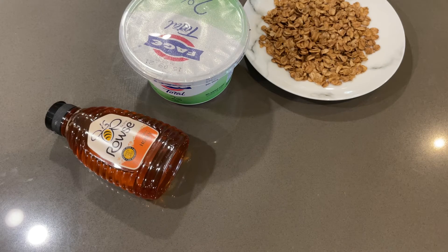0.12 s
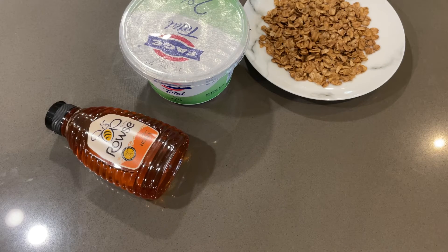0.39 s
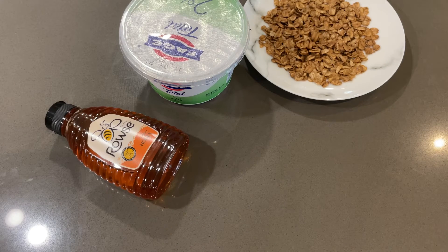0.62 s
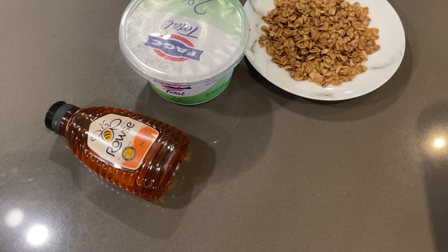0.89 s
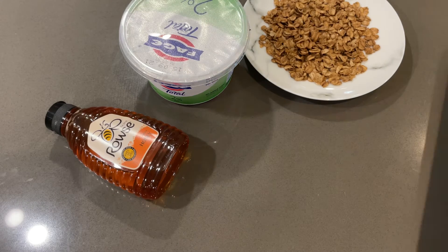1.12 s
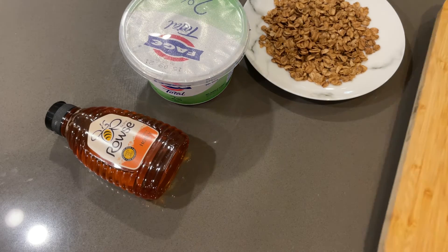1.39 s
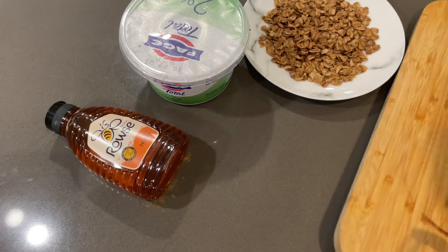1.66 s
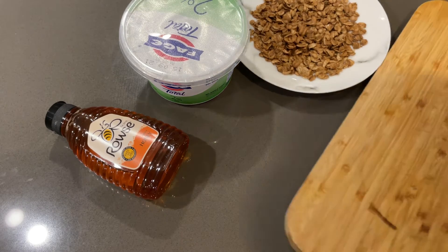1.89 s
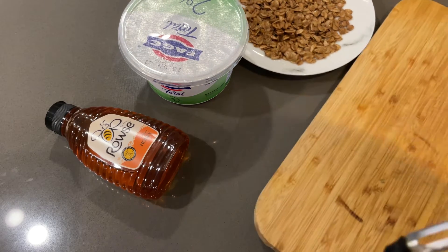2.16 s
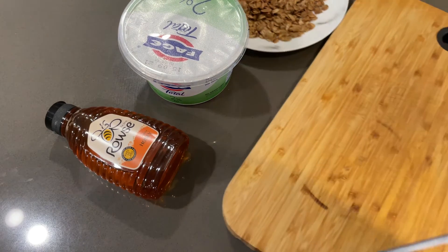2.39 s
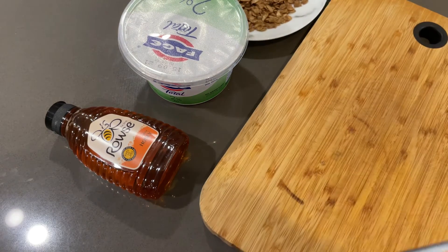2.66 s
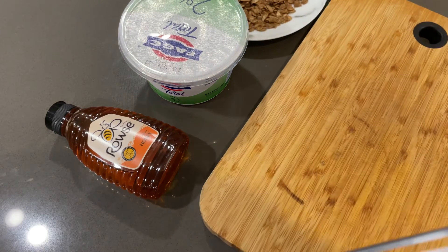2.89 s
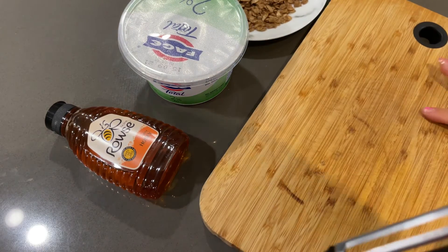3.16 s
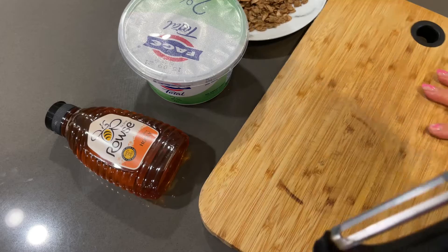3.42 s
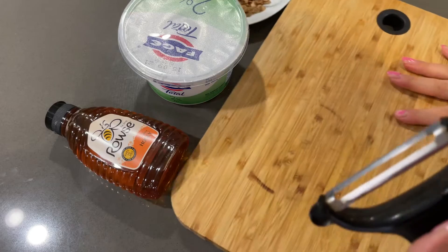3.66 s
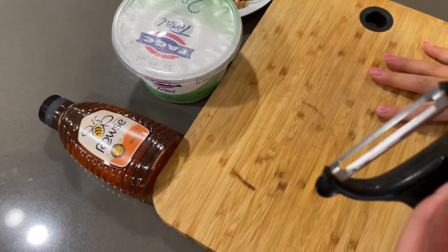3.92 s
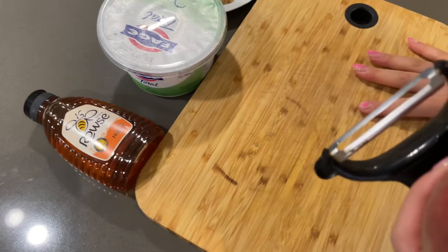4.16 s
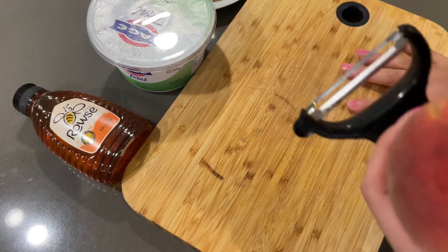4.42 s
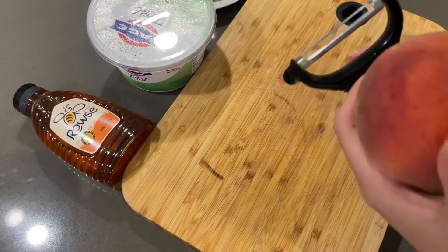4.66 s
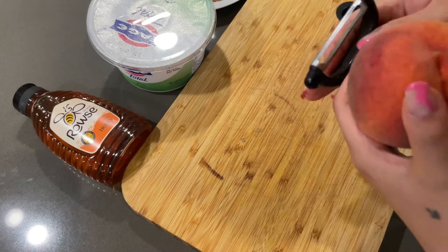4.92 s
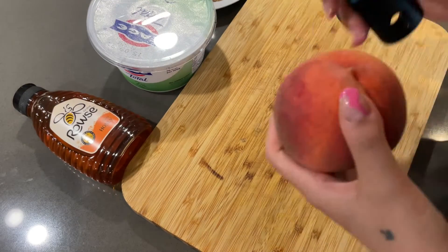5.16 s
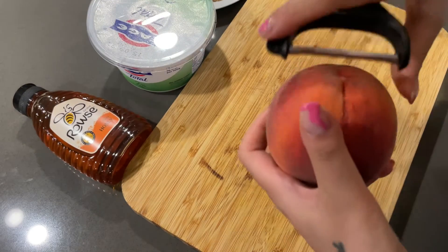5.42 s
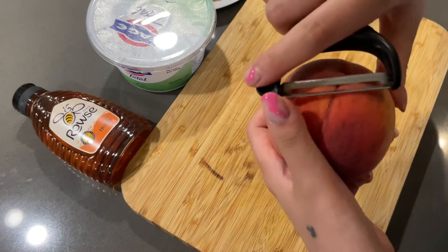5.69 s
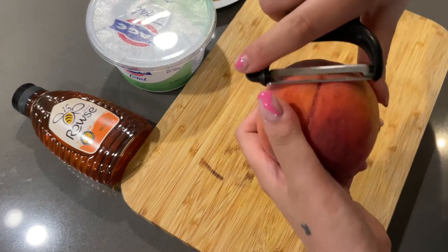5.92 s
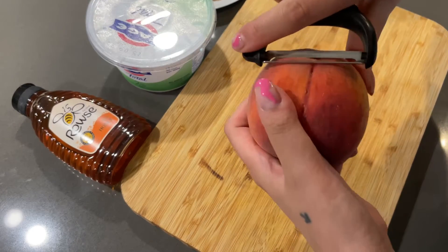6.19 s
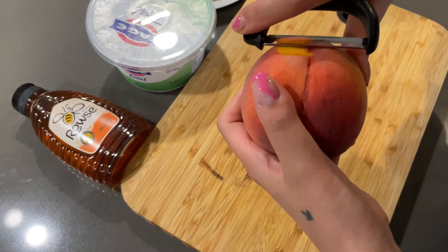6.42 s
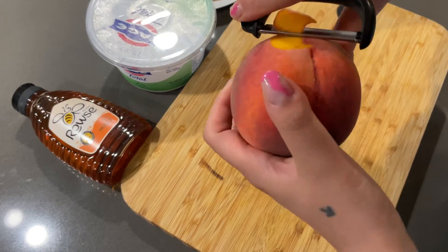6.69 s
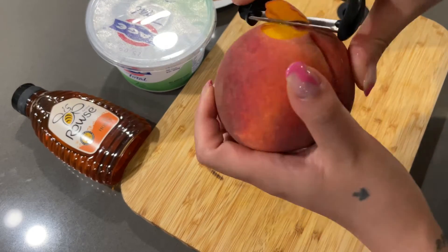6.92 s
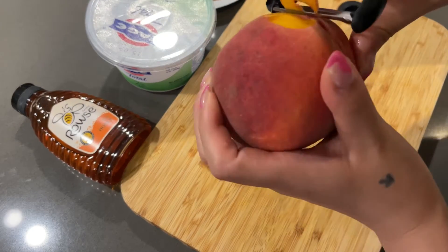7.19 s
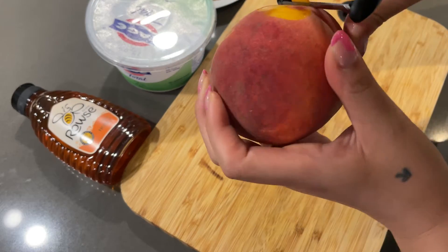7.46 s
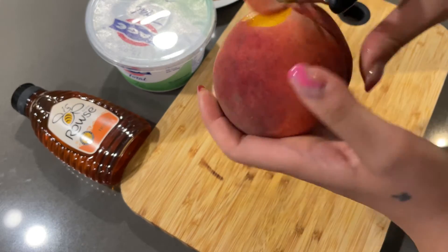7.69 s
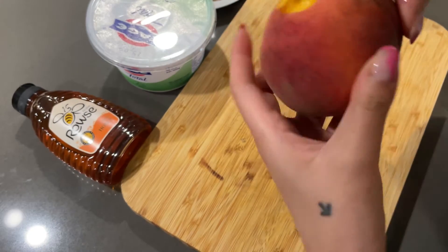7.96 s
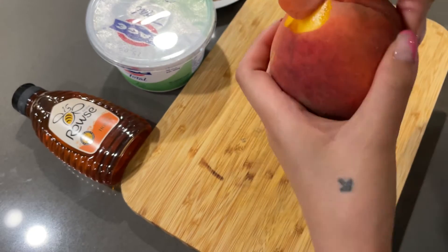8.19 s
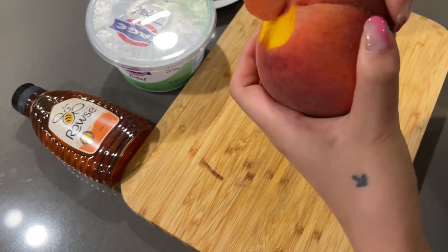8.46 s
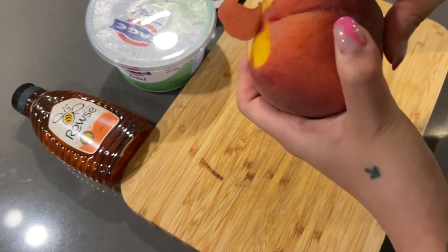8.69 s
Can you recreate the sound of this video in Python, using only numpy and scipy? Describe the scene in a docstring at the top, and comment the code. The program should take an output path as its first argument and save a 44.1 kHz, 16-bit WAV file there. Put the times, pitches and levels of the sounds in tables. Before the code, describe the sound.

A small kitchen heard closely in stereo, with low rumble, faint hiss and a weak appliance hum. Two dull bumps open at 0 and 0.15 s, with a tiny click near 0.25, then near quiet. From 1.27 s a wooden board knocks on stone, harder at 1.5, with the loudest woody bang at 1.75. Bright ceramic clatter crowds around 1.7 to 2.2 s, while plate and board drag with a gritty scrape until about 2.6. A lull with faint brushing follows. At 3.43 s comes another sharp plate clank and knock, then a softer slide and small thuds fading by 4.4. From 4.8 to 5.5 s a loose metal blade ticks lightly amid hand rubbing. A short crisp scrape at 6.3 leads into faint, irregular peeling strokes, soft around 7, clearer at 8.3, 8.45 and 8.8 s.

```python
"""Cutting board, plate and peeler

A wooden cutting board is set down on a stone counter and pushed against a plate, which clatters and is dragged along.
Then a hand takes up a swivel peeler, its loose blade clicking, and peels a peach. An appliance hums in the kitchen.
Contacts are short noise bursts that ring the modes of a body; sliding, touching and peeling are shaped noise.
Two microphone ports a short way apart hear it all, the left one first."""
import sys
import numpy as np
from scipy import signal
from scipy.fft import rfft, irfft, next_fast_len
from scipy.io import wavfile
from scipy.ndimage import uniform_filter1d, map_coordinates

SR = 44100
rng = np.random.default_rng(int(sys.argv[2]) if len(sys.argv) > 2 else 0)


def ratio(d):
    """dB to gain"""
    e = np.asarray(d, float) / 20
    return 10 ** e


def wav_record(signal):
    """Record a signal, one row per channel, as 16-bit PCM in the file named by sys.argv[1]."""
    frames = np.transpose(np.atleast_2d(signal))
    bounded = np.clip(frames, -1, 1)
    # unit amplitude maps onto the largest positive 16-bit level
    quanta = np.round(bounded * 32767).astype(np.int16)
    wavfile.write(sys.argv[1], SR, quanta)


N = 389403  # length in samples

# Colour of the room's rumble and hiss. Each row: frequency in Hz, relative level in dB.
AIR = [(20, -48.5), (35, -21), (50, -6), (70, -7), (110, -9), (250, -22.5), (600, -26.5), (1200, -40),
       (2500, -45), (6000, -48), (9000, -47.5), (14000, -39.5), (16500, -53)]
AIR_DB = -63
# Hum of the appliance. Each row: frequency in Hz, level in dB rms ahead of the microphone's bass cut.
HUM = [(49, -56.5), (99, -70.5), (247.6, -78), (403, -83.5)]
# How long the kitchen rings. Each row: frequency in Hz, time in seconds to die by 60 dB.
KITCHEN = [(100, 0.73), (500, 0.36), (2000, 0.38), (6000, 0.17), (14000, 0.38)]
# Width of the diffuse sound. Each row: frequency in Hz, side over middle in dB.
SPREAD = [(60, -33), (200, -16.5), (600, -1), (1100, -3.5), (1800, -16), (3200, -4), (4800, -4.5),
          (5600, -11), (7000, -11), (10000, -19), (13000, -5), (15000, -25)]
# How far the left port is ahead of the right. Each row: frequency in Hz, lead in radians.
PORTS = [(0, 0), (350, .1), (950, 1), (1600, .3), (3400, .5), (4300, 1.1), (4800, 3.1), (5400, 6.3),
         (6900, 7.7), (8600, 8.6), (9200, 9.3), (11000, 9.6), (14500, 12.57), (22050, 12.57)]

# Contacts of the board, most of them dull, and two faint late clicks or taps.
# Each row: start in seconds, peak level in dB, brightness in dB per octave, favoured mode in Hz,
# ring over broad sound in dB.
KNOCKS = [(.003, -19, -3.5, 575, 2), (.155, -20, 3.08, 590, 8), (1.266, -15.5, -1.5, 530, 11),
          (1.338, -27.5, 0, 507, 13.5), (1.5224, -8.5, 2, 523, 3), (1.526, -13.5, 2.5, 1360, 3.5),
          (1.603, -24, 3.5, 510, 9), (1.755, 4, 2, 916, 2.5), (1.786, -7.5, -0.5, 912.6, 9),
          (1.913, -9.5, -3, 599.8, -6.5), (1.973, -13.5, -1, 320, -2.5), (2.047, -22.5, 1, 1365, -4),
          (2.093, -27, -0.5, 596.5, -0.5), (2.118, -13, -0.5, 1080, 0), (2.522, -17.5, -5, 151, -9),
          (3.105, -41, -4.5, 129, -6.5), (3.345, -44, -5, 500, -3), (3.436, -11, 0.5, 612, -4),
          (3.726, -23, -6, 520, 13), (3.758, -26.5, -7, 129, 6), (3.823, -19.5, 0, 600, -16),
          (3.944, -29.5, -7.5, 600, 20), (5.743, -43.5, 7.5, 1664, 5), (8.1424, -51, -3.5, 916, -8)]
KNOCK_MS, KNOCK_MS_PER_DB = 2.6, 0.43  # rattle of a 0 dB blow in ms; softer contacts last longer
# Plate contacts. Each row: start in seconds, peak level in dB, rattle in ms, favoured mode in Hz,
# ring over broad sound in dB.
CLATTER = [(1.6785, -20.5, 12, 2980, 0.5), (1.692, -19, 12, 1932, -1), (1.7655, -4.5, 12, 3480, 8),
           (1.8005, -6.5, 17, 3294, 7), (1.81, -3.5, 16, 2950, 3), (1.841, -10.5, 18, 5404, 3),
           (1.941, -3.5, 6.7, 3497, 5.5), (1.965, -15, 20, 1993, -1), (2.1099, -6, 30, 2007, 1),
           (2.131, -4, 23, 5580, 6.5), (2.153, -9.5, 25, 1926, 4), (2.187, -20.5, 24, 1985, -2),
           (3.414, -40.5, 16, 3380, 6), (3.422, -22, 10, 3340, 2.5), (3.4331, 1.5, 12, 5292, 2),
           (3.445, -5.5, 12, 2929, 6), (3.4921, -21.5, 6.5, 2000, -5), (3.494, -3, 10, 7400, 5),
           (3.504, -10, 46, 3047, 5.5), (3.825, -22, 7.33, 1916, -3)]
PLATE_SLOPE_DB = -0.85  # brightness in dB per octave
# Peeler blade clicks. Each row: start in seconds, peak level in dB, rattle in ms,
# brightness in dB per octave, favoured mode in Hz.
CLICKS = [(.2388, -35.5, 9.3, 12, 7000), (.966, -43.5, 11, 5.5, 12000), (2.824, -33.5, 3.6, 10, 3700),
          (4.8065, -34.5, 12, -0.2, 5200), (4.82, -38.5, 10, -0.5, 5300), (4.8781, -29, 12, 1.5, 5320),
          (4.9392, -35.5, 53, -0.5, 5280), (4.9653, -34, 12, 0.5, 2750), (5.115, -50, 8, -1, 3000),
          (5.149, -36.5, 9.8, 3, 7000), (5.254, -25, 9.2, 5, 3700), (5.281, -46, 13, -0.5, 4400),
          (5.3376, -42, 11, 4.5, 4400), (5.475, -32, 24, -1, 5280), (5.502, -21, 15.4, 0.5, 5700),
          (7.7483, -45.5, 4.56, 1, 3700)]
BLADE_RING_DB = -2.5  # ring over broad sound
# Plate and board sliding on stone, one list for each of two pushes. Each row: time in seconds, level in dB.
DRAG = [
    [(1.64, -81.5), (1.696, -43.5), (2.026, -45.5), (2.282, -39.5), (2.434, -42.5), (2.595, -57),
     (2.63, -65), (2.72, -86)],
    [(3.47, -65), (3.628, -43), (3.83, -56.5), (4.184, -56), (4.338, -64), (4.45, -95)],
]

# Natural tones (modes) of the three bodies.
# Each row: frequency in Hz, relative level in dB, time in seconds to die by 60 dB.
BOARD = [(70, -7, 0.21), (102, -3.5, 0.71), (151, -1, 0.064), (209.35, -5, 0.36), (320, -18, .05),
         (437, -14.5, .08), (537, -7, 0.026), (523, -1.5, 0.17), (590, -3, 0.12), (834, -12, .12),
         (916, -7.5, 0.11), (1080, -6, 0.16), (1348, -13.5, 0.17), (1650, -10, 0.022)]
PLATE = [(1080, -8, .07), (1406, -1, 0.052), (1916, -12.5, 0.043), (2000, -6, 0.2), (2945, -6.5, 0.27),
         (3360, -6, 0.063), (3532, -8, 0.076), (3510, -12, 0.1), (3990, -7.5, 0.09), (5365, -0.5, 0.04),
         (5490, -1.5, 0.054), (5690, -7.5, 0.05), (7170, -7, 0.066), (7850, -1.5, 0.06), (7480, -6, 0.043),
         (10000, -13, 0.089), (10420, -12, 0.071), (12110, -19, .07), (12600, -15, 0.073),
         (15030, -29.5, .08)]
BLADE = [(2256, 6, 0.058), (2750, 13.5, 0.0082), (3700, -6.5, 0.022), (4400, -1, 0.031), (5280, -2, 0.035),
         (5700, 11, 0.01), (12000, -8, 0.18)]
# Broad sound of a board, plate and blade contact, of sliding, and of touching and peeling.
# Each row: frequency in Hz, relative level in dB.
THUD = [(40, -21.5), (100, 5), (600, -0.5), (1500, 5.5), (3000, -12), (6000, -34), (16000, -54)]
CHINK = [(200, -26), (800, -11), (2000, 3.5), (4000, -7), (8000, -11), (12000, -26), (16000, -30)]
TICK = [(400, -61), (1500, -19.5), (3000, -1.5), (6000, 0.5), (9000, -3.5), (13000, -10), (16000, -19)]
GRIT = [(100, -19), (600, -2), (1300, 3), (2500, -5), (5000, -13), (6500, -12.5), (8000, -13), (12000, -28),
        (16000, -38.5)]
SKIN = [(250, -15), (700, 6), (1600, -5.5), (3000, -1.5), (4200, -1.5), (6000, -3), (8000, -6),
        (11000, -6.5), (14000, -7.5), (16000, -12.5)]

# A touch swells to its peak and dies away. Rise and fall each span TOUCH_RANGE_DB.
# Roundness 1 gives a pointed peak, more gives a flatter top and steeper edges.
TOUCH_RANGE_DB, TOUCH_ROUNDNESS = 19.5, 1.2
# Fingers brushing wood, handle and fruit. Each row: peak in seconds, rise in seconds, fall in seconds,
# level in dB, brightness in dB (added to the bright part and taken from the dull part).
BRUSHES = [(.01, 0.056, 0.13, -50, -17), (.17, 0.055, 0.18, -58.5, -22.5), (.32, .1, 0.24, -72.5, -2.5),
           (.65, .15, 0.19, -78.5, 7), (.975, .05, 0.28, -63.5, -2), (2.85, .1, .3, -71.5, 8),
           (3.13, 0.13, .5, -64.5, -2.5), (4.6, 0.085, .1, -77, -12), (5.0, 0.28, 0.55, -65, 2),
           (5.3, 0.44, 0.43, -66.5, 3.5), (5.58, 0.087, .4, -68, -2.5), (5.93, 0.13, .08, -66, 2.5),
           (6.17, 0.024, .12, -70.5, -7.5)]
# The blade drawn under the skin. Each row: peak in seconds, rise in seconds, fall in seconds,
# level in dB, brightness in dB (as above).
STROKES = [(6.326, 0.031, 0.051, -46, 1.7), (6.47, 0.19, .2, -79, 6.2), (6.74, 0.22, 0.16, -65.5, 1.48),
           (6.98, 0.085, .25, -73.5, 6.7), (7.15, 0.12, 0.18, -60.5, 3.6), (7.4, 0.057, 0.12, -65, 3),
           (7.48, 0.058, 0.027, -67.5, 4.9), (7.62, .07, .2, -70, 2.6), (7.8, .08, .17, -72.5, 6.1),
           (7.98, 0.042, 0.068, -78, 5), (8.11, 0.059, 0.071, -74, 3), (8.235, 0.0199, 0.099, -66, 5.8),
           (8.29, 0.055, 0.07, -54, 2.6), (8.445, 0.11, 0.071, -56, 2), (8.67, 0.051, .15, -65.5, 6.4),
           (8.77, 0.12, 0.13, -52, 2.7)]


def along(points, hz):
    """Reads a curve of (Hz, value) points on a logarithmic frequency axis."""
    f, v = np.transpose(points)
    return np.interp(np.log(hz + 1), np.log(f + 1), v)


def unit(x):
    """Scales x to rms 1."""
    return x / np.sqrt(np.mean(x ** 2) + 1e-20)


def filtered(x, response):
    """Filters x by a response, possibly complex, given as a function of frequency."""
    n = x.shape[-1]
    padded = next_fast_len(n + 4096)
    hz = np.fft.rfftfreq(padded, 1 / SR)
    return irfft(rfft(x, padded) * response(hz), padded)[..., :n]


def coloured(x, curve):
    """Filters x by a curve of (Hz, dB) points."""
    return filtered(x, lambda hz: ratio(along(curve, hz)))


def tilt(hz, db_per_octave):
    """A slope in level that turns about 2 kHz."""
    return ratio(db_per_octave * np.log2((hz + 50) / 2000))


def wobble(rate):
    """A smooth random curve with the given number of random points a second."""
    points = rng.standard_normal(int(N * rate / SR) + 4)
    return map_coordinates(points, [np.arange(N) * rate / SR])


def wide(pair):
    """Makes two signals, middle and side, into left and right of a diffuse sound."""
    side = coloured(pair[1], SPREAD)
    return np.array([pair[0] + side, pair[0] - side])


def room_tone():
    """Low rumble and faint hiss are filtered noise; the appliance's hum is a few wavering sine tones."""
    t = np.arange(N) / SR
    air = unit(coloured(rng.standard_normal((2, N)), AIR))
    hum = 0
    for hz, db in HUM:
        swell = ratio(db + 3.5 + 0.6 * wobble(42))  # about 3 dB turns rms into sine peak
        hum = hum + swell * np.sin(2 * np.pi * hz * t + 0.9 * wobble(5.2))
    drift_db = 1.2 * wobble(3)
    return ratio(AIR_DB + drift_db) * wide(air) + hum


def kitchen(x, early_db):
    """Quick echoes off counter and wall, then a fresh tail in which each frequency dies at its own speed."""
    hz, t, noise = signal.stft(rng.standard_normal((2, SR // 2)), SR, nperseg=256)
    late = ratio(-60 * t / along(KITCHEN, hz)[:, None])
    early = ratio(early_db - 60 * t / 0.087)
    tail = signal.istft(noise * (late + early), SR, nperseg=256)[1]
    tail = tail / np.linalg.norm(tail[0])
    delayed = np.pad(x, (150, 0))  # samples
    return signal.fftconvolve(delayed[None], tail, axes=1)


def rattle(ms, rise_ms, hold):
    """A short noisy run of tiny impacts that holds, then stops, its spectrum partly evened out."""
    t = np.arange(4096) / SR * 1000  # ms
    shape = ratio(-14 * (t / max(ms, 1)) ** hold) * (1 - np.exp(-t / rise_ms))
    uneven = ratio(3 * rng.standard_normal(size=128)).repeat(32)
    spectrum = rfft(shape * rng.standard_normal(len(t)) * uneven)
    return irfft(spectrum / np.abs(spectrum) ** .5) * np.sqrt(shape)


def ringing(modes, favoured_hz, favour_db):
    """The answer of a body to one tap, of energy 1; modes near the favoured frequency get their own lift."""
    t = np.arange(SR // 3) / SR
    hz, db, t60 = np.transpose(modes)[:, :, None]
    octaves_off = np.log2(hz / favoured_hz)
    lift_db = favour_db * np.exp(-(octaves_off / .15) ** 2) + 1.8 * rng.standard_normal(hz.shape)
    fade = ratio(db + lift_db - 60 * t / np.maximum(t60, .005))
    ring = np.sum(fade * np.sin(2 * np.pi * hz * t), axis=0)
    ring *= np.cos(np.pi / 2 * t / t[-1])  # what is left fades out softly
    return ring / np.linalg.norm(ring)


def evened(modes, blow):
    """Lifts modes that the blow feeds weakly and lowers those it feeds strongly, within limits."""
    bins = np.round(np.transpose(modes)[0] / 2).astype(int)  # 2 Hz apart
    fed = np.abs(rfft(blow, SR // 2))[bins] / np.linalg.norm(blow)
    fed_db = 20 * np.log10(np.clip(fed, .3, 3))
    return np.array(modes) - np.outer(fed_db, [0, 1, 0])


def strikes(events, modes, broad, favour_db, rise_ms, hold, room_db):
    """Each contact is heard broadly, through the modes of the body, and in the room."""
    out = np.zeros((2, N + 2 * SR))
    for s, db, ms, slope_db, mode_hz, ring_db in events:
        blow = rattle(ms, rise_ms, hold)
        rung = signal.fftconvolve(blow, ringing(evened(modes, blow), mode_hz, favour_db))
        plain = coloured(np.pad(blow, (0, len(rung) - len(blow))), broad)
        both = plain / np.linalg.norm(plain) + ratio(ring_db) * rung / np.linalg.norm(rung)
        sound = filtered(both, lambda hz: tilt(hz, slope_db))
        # the loudest 200 samples get an rms 10 dB under the peak level
        sound *= ratio(db - 10) / np.sqrt(np.max(uniform_filter1d(sound ** 2, size=200)))
        wet = ratio(room_db) * kitchen(sound, early_db=1.0)
        wet[0, :len(sound)] += sound  # the direct sound has no diffuse part
        out[:, round(s * SR):][:, :wet.shape[1]] += wet
    return wide(out[:, :N])


def board_knocks():
    """Contacts, softer ones longer, ring the modes of the wooden board."""
    knocks = [(s, db, KNOCK_MS - KNOCK_MS_PER_DB * db, slope_db, hz, ring_db)
              for s, db, slope_db, hz, ring_db in KNOCKS]
    return strikes(knocks, BOARD, THUD, favour_db=16.5, rise_ms=1.1, hold=2.1, room_db=-3.5)


def plate_clatter():
    """Short rattling blows ring the higher modes of the plate."""
    clatter = [(s, db, ms, PLATE_SLOPE_DB, hz, ring_db) for s, db, ms, hz, ring_db in CLATTER]
    return strikes(clatter, PLATE, CHINK, favour_db=6.0, rise_ms=0.89, hold=5.3, room_db=-8.5)


def patchy(rough, patchy_db):
    """Two noises whose colour shifts in patches as a contact moves."""
    noise = signal.stft(rng.standard_normal((2, N)) * rough, nperseg=256)[2]
    field = rng.standard_normal(noise.shape[1:])
    field = uniform_filter1d(field, size=3, axis=0)  # over frequency
    field = uniform_filter1d(field, size=16, axis=1)  # over time
    return signal.istft(noise * ratio(patchy_db * unit(field)), nperseg=256)[1][:, :N]


def level(spans):
    """One dB value per sample from lists of (seconds, dB) rows."""
    return np.interp(np.arange(N) / SR, *np.concatenate(spans).T)


def moving(spans):
    """1 while an object slides, else 0, with soft edges."""
    t = np.arange(N) / SR
    sliding = sum(1. * (t >= rows[0][0]) * (t <= rows[-1][0]) for rows in spans)
    return uniform_filter1d(sliding, size=1500)


def drag():
    """Grit under the sliding rim makes a rough hiss that keeps plate and board ringing, damped by the pressure."""
    grit = patchy(ratio(1.3 * wobble(150)), patchy_db=1.5)
    pressed = [1, 1, .4]  # modes die sooner against the stone
    plate_ring = ringing(np.multiply(PLATE, pressed), 2500, favour_db=-4.5)
    board_ring = ringing(np.multiply(BOARD, pressed), 2000, favour_db=4.5)
    hiss = unit(coloured(grit, GRIT))
    plate = unit(signal.fftconvolve(grit, plate_ring[None], axes=1)[:, :N])
    board = unit(signal.fftconvolve(grit, board_ring[None], axes=1)[:, :N])
    sliding = hiss + ratio(-4.5) * plate + ratio(-12.0) * board
    return moving(DRAG) * ratio(level(DRAG)) * wide(sliding)


def blade_clicks():
    """Tiny sharp blows ring the short, high modes of the loose blade."""
    clicks = [(*row, BLADE_RING_DB) for row in CLICKS]
    return strikes(clicks, BLADE, TICK, favour_db=17.5, rise_ms=0.25, hold=1.3, room_db=-8)


def rub(touches):
    """Fingers and peeling: fine friction noise with a few crisp grains, each touch with its own brightness."""
    grains = ratio(9 * rng.random(N) * (rng.random(N) < .05))
    rough = ratio(1.2 * wobble(50) + 0.7 * wobble(300))
    body = unit(coloured(patchy(rough * grains, patchy_db=1.6), SKIN))
    low = filtered(body, lambda hz: 1 / (1 + (hz / 2500) ** 2))
    t = np.arange(N) / SR
    dull, bright = 0, 0  # power of each part
    for s, rise_s, fall_s, db, bright_db in touches:
        away = np.maximum((s - t) / max(rise_s, .01), (t - s) / max(fall_s, .01))
        power = ratio(db - TOUCH_RANGE_DB * away ** TOUCH_ROUNDNESS) ** 2
        dull = dull + power * ratio(-2 * bright_db)
        bright = bright + power * ratio(2 * bright_db)
    return wide(np.sqrt(dull) * low + np.sqrt(bright) * (body - low))


def scene():
    """Adds up all sources in left and right."""
    contacts = board_knocks() + plate_clatter() + blade_clicks()
    return contacts + drag() + rub(BRUSHES + STROKES) + room_tone()


def low_pass(x):
    """Removes everything above the highest recorded frequency."""
    return signal.sosfilt(signal.butter(12, 16500, fs=SR, output="sos"), x)


def record(dry):
    """The microphone drops deep bass and top treble; port phases cancel in the sum near 10 kHz; peaks are rounded."""
    hz_at, lead = np.transpose(PORTS)

    def port_response(hz):
        bass_cut = (1j * hz / (1j * hz + 40)) ** 3
        treble_cut = 1 / (1 + (hz / 15900) ** 40)
        half_lead = .5j * np.interp(hz, hz_at, lead) * np.array([[1], [-1]])  # left ahead, right behind
        return bass_cut * treble_cut * np.exp(half_lead)

    ports = filtered(dry, port_response)
    mix = ports / (1 + np.abs(ports / .95) ** 6) ** (1 / 6)  # the loudest peaks are rounded off
    return low_pass(mix)


dry = scene()
out = record(dry)
wav_record(out)
```